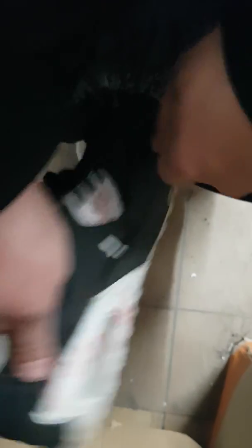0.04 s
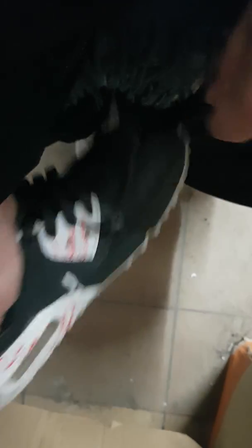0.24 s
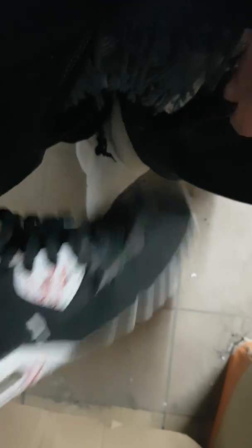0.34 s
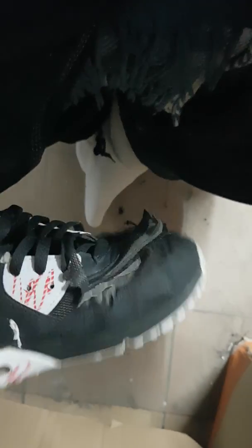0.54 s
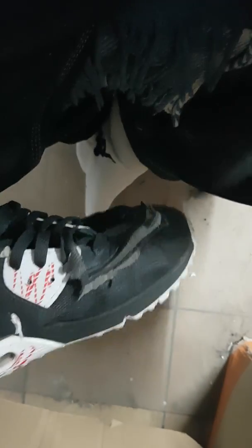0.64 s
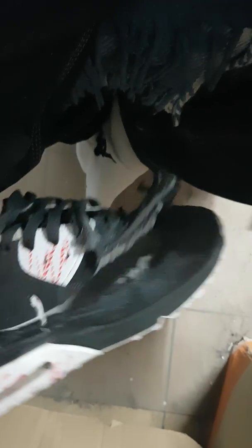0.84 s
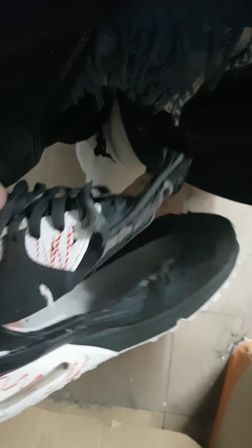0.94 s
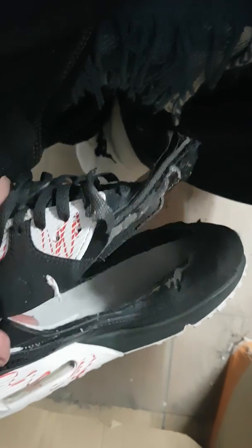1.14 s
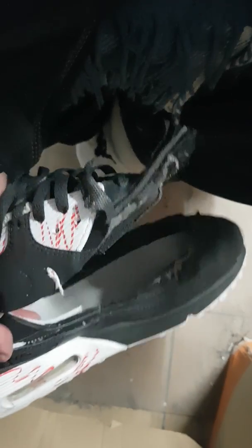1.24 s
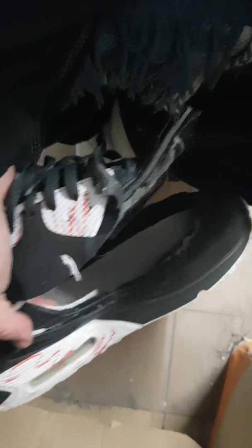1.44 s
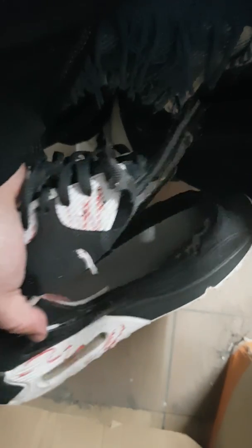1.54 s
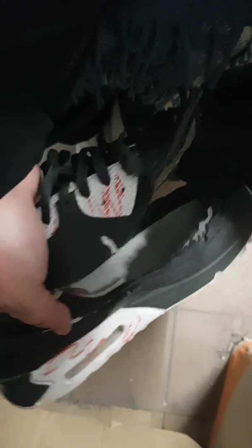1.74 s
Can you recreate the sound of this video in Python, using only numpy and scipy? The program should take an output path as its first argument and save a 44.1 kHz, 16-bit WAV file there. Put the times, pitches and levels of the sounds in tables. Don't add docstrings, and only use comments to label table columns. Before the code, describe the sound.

A sneaker's rubber sole slaps and scuffs tiles, close and left: light ticks from 0.1 s, a dense burst of hollow knocks, gritty scrape and dry cracks at 0.2-0.27 s, with soft low thumps, then a weaker knock at 0.33 s. Clothes rustle and fold softly throughout. From 1.3 to 1.8 s fabric slides with a faint, very high whine; a stitch snaps at 1.6 s. Small hard room, low appliance hum.

```python
import sys
import numpy as np
from scipy import signal
from scipy.fft import rfft, irfft
from scipy.io import wavfile
from scipy.ndimage import uniform_filter1d, map_coordinates

SR = 44100
rng = np.random.default_rng(int(sys.argv[2]) if len(sys.argv) > 2 else 0)


def decibels_to_gain(level_db):
    exponent = np.asarray(level_db, float) / 20
    return 10 ** exponent


def int16_out(signal):
    q = np.round(np.clip(np.atleast_2d(signal).T, -1, 1) * 32767)
    wavfile.write(sys.argv[1], SR, q.astype(np.int16))


N = 79380
T = np.arange(N) / SR

# [f/Hz, level/dB per Hz]
ROOM_AIR = [(25, -42), (60, -21), (120, -2.5), (250, -6), (700, -12.5), (1500, -22.5), (4000, -39),
            (7000, -51), (16000, -28)]
# [f/Hz, left minus right/dB]
ROOM_BALANCE = [(60, -28), (200, -3.5), (700, -2.5), (1300, 0), (2400, 10), (5000, 14), (15000, 7.5)]
# [f/Hz, likeness, limited to -0.95 to 0.95 in use]
ROOM_LIKENESS = [(40, -0.1), (300, 0.75), (640, -0.19), (1400, -1.44), (3100, 0.61), (15000, -0.043)]
# [f/Hz, waver/dB, level/dB, left minus right/dB]
APPLIANCE_HUM = [(35.8, .5, -57.5, 0), (49, 2, -73, 0), (90, 2, -65, -10), (144.2, .8, -60.5, -6),
                 (165, 2.5, -68, -5), (205, 4, -73, -4)]
# [t/s, level/dB, brightness/dB per octave]
RUSTLE_MOVES = [(0, -66.5, -2.2), (.4, -68.5, 1), (.7, -70, 0.1), (.98, -70, 0.93), (1.08, -74, -1),
                (1.25, -73.5, -1.5), (1.4, -69, -1.5), (1.65, -66, -1.8), (1.8, -72.5, -1.5)]
# [f/Hz, level/dB per Hz]
CLOTH_TONE = [(250, 3.5), (450, 1.5), (800, -2), (1300, -16), (3000, -14.5), (5000, -41), (9000, -29.5),
              (16000, -25.5)]
# [t/s, level/dB]
SCUFF_PRESSURE = [(0, -53), (.045, -68.5), (.1, -68), (.165, -53.5), (.198, -50), (.206, -38),
                  (.235, -35.5), (.27, -48.5), (.33, -58.5), (.35, -71), (.42, -79)]
# [f/Hz, level/dB per Hz]
GRIT_TONE = [(700, -31), (1300, -0.5), (2500, -1), (4500, -9.5), (8000, -9.5), (12000, -10), (16000, -10)]
# [f/Hz, level/dB, time to fall 60 dB/s]
SHOE_MODES = [(234, -14, 0.031), (300, -8.5, 0.03), (436, -10.5, 0.019), (680, -6, 0.013),
              (827, 5.5, 0.013), (1058, -0.5, 0.017), (1240, -8, 0.014), (1640, -7, 0.0084)]
# [t/s, peak level/dB, f/Hz]
CLOTH_FOLDS = [(0.018, -44.5, 332), (0.516, -52.5, 336), (0.552, -55, 350), (0.682, -52.5, 336),
               (0.797, -53.5, 259), (0.832, -46.5, 256), (0.859, -50.5, 384), (1.348, -52, 428),
               (1.494, -47.5, 218), (1.564, -48, 420), (1.75, -54.5, 221)]
# [t/s, peak level/dB, centre f/Hz, decay/ms]
THREAD_SNAPS = [(.1085, -44, 8000, .6), (0.1182, -29.5, 11500, 0.8), (.13, -45, 9000, 1.7),
                (.138, -34, 13500, 1.4), (0.1434, -35, 3480, 0.23), (0.15, -42, 10000, .9),
                (.1575, -45, 12000, .6), (0.168, -39, 11000, .6), (0.172, -37, 7500, .7),
                (0.1773, -31.5, 9500, .7), (0.182, -42, 10000, .6), (.1855, -32, 9100, 1.1),
                (0.194, -38, 9000, 0.47), (0.197, -31, 11000, 0.68), (0.2023, -33, 6000, .7),
                (0.209, -38, 6000, 0.52), (0.213, -25, 4000, 0.37), (0.213, -16, 3130, 0.83),
                (.2153, -17, 5940, 0.91), (0.2255, -17, 5930, 0.36), (.227, -18.5, 5040, 0.27),
                (.2297, -19, 12000, 0.44), (0.2323, -26, 6500, 0.45), (0.2341, -20.5, 5950, 0.53),
                (.2375, -22, 13000, 0.5), (0.2422, -15, 10000, 0.6), (0.249, -18.5, 9000, 0.7),
                (.251, -33, 10000, .6), (.2595, -22, 8050, 0.49), (.269, -34, 10000, 3.4),
                (.279, -37, 9000, 1.8), (.332, -35.5, 3920, 1.1), (0.3355, -28.5, 12600, 1.2),
                (0.458, -48, 9000, 1.5)]
# [t/s, peak level/dB, f/Hz, time to fall 60 dB/s]
SOLE_KNOCKS = [(0.1131, -39, 304, 0.039), (0.1176, -29, 470, 0.015), (0.13, -44, 200, 0.046),
               (0.144, -31, 606, .02), (.16, -36, 190, .05), (.167, -42, 925, 0.023),
               (0.1777, -26, 1026, 0.024), (.186, -35, 1000, .02), (0.1936, -22, 1030, .015),
               (0.1986, -26.5, 870, 0.023), (.2025, -14.5, 680, 0.033), (.208, -19.5, 1080, .02),
               (.212, -13, 910, 0.027), (.2145, -13, 837, 0.046), (0.2207, -15, 607, 0.043),
               (.2262, -9, 680, 0.077), (.228, -5, 680, 0.035), (.232, -12.5, 461, 0.044),
               (0.2363, -11, 512, 0.025), (0.2426, -9.5, 291, 0.032), (.249, -17, 410, 0.023),
               (.26, -10, 713, 0.015), (.265, -25, 438, 0.038), (.279, -27, 680, 0.036),
               (.296, -38, 626, .04), (.332, -22, 718, 0.035), (0.3354, -23, 1088, 0.023),
               (.209, -20.5, 242, 0.08), (0.218, -22, 1270, 0.023), (.234, -19, 1066, 0.027),
               (.246, -23, 238, .05), (.251, -19, 1100, 0.018), (.334, -26.5, 867, 0.047)]
# [t/s, peak level/dB, f/Hz, time to fall 60 dB/s]
HEEL_THUMPS = [
    (.119, -36, 150, .07),
    (.154, -38, 145, .07),
    (.207, -39, 60, .1),
    (.25, -33, 112, .11),
]
# [t/s, threads crossed per second as f/Hz, level/dB]
SLEEVE_SLIDE = [(1.255, 7800, -80), (1.29, 9100, -85), (1.32, 9800, -83), (1.355, 11050, -71),
                (1.385, 11850, -71), (1.46, 12420, -68), (1.485, 11950, -67), (1.515, 11850, -66),
                (1.55, 12300, -67), (1.605, 14150, -69), (1.63, 14850, -72), (1.655, 14850, -73),
                (1.685, 13800, -77), (1.72, 13150, -78), (1.75, 12400, -69), (1.775, 10600, -82),
                (1.8, 8700, -87)]
# [start t/s, end t/s, share of main pitch at start, share at end, level/dB]
WEAVE_PATCHES = [(1.33, 1.48, 1.04, 1.02, -70), (1.46, 1.59, 1.05, 1.02, -71),
                 (1.68, 1.735, .915, .845, -66), (1.38, 1.56, .8, .83, -87), (1.34, 1.45, 1.29, 1.27, -85),
                 (1.56, 1.63, .84, .76, -79), (1.6, 1.72, .8, .86, -79), (1.73, 1.79, 1.17, 1.2, -78),
                 (1.33, 1.5, .94, .93, -83), (1.71, 1.75, .84, .82, -80), (1.655, 1.69, .98, .99, -77),
                 (1.73, 1.77, 1.07, 1.02, -76), (1.74, 1.78, .76, .78, -86), (1.66, 1.71, 1.04, 1.03, -82)]
# [t/s, peak level/dB, low edge f/Hz, high edge f/Hz]
STITCH_BREAK = (1.5947, -30, 450, 11800)
# [f/Hz, level/dB, time to fall 60 dB/s]
STITCH_FIBRES = [(2700, -5, .004), (5100, -1, .006), (7600, -5, .004), (9000, -4, .005), (11300, -4, .007)]
LEFT_RIGHT = np.array([[1], [-1]])


def unit(x):
    return x / np.sqrt(np.mean(x ** 2))


def curve(rows, col=1):
    rows = np.array(rows)
    return np.interp(T, rows[:, 0], rows[:, col])


def along(rows, hz):
    rows = np.array(rows)
    return np.interp(np.log(np.maximum(hz, 1)), np.log(rows[:, 0]), rows[:, 1])


def colour(x, rows):
    cepstrum = irfft(along(rows, np.fft.rfftfreq(2048, 1 / SR)) * np.log(10) / 20)
    cepstrum[1:1024] *= 2
    cepstrum[1025:] = 0
    response = irfft(np.exp(rfft(cepstrum)))[:1024]
    return signal.fftconvolve(x, response)[:N]


def band(x, hz, width_hz):
    return signal.lfilter(*signal.iirpeak(min(hz, 0.45 * SR), hz / width_hz, SR), x)


def walk(rate_hz):
    hold = int(SR / rate_hz)
    steps = np.repeat(rng.standard_normal(N // hold + 1), hold)
    return unit(uniform_filter1d(uniform_filter1d(steps, hold), hold)[:N])


def fade(t, t60_s):
    return 1000. ** (-t / t60_s)


def ring(hz, t60_s, size=4000):
    t = np.arange(size) / SR
    return np.sin(2 * np.pi * hz * t) * fade(t, t60_s)


def room():
    hz = np.fft.rfftfreq(N, 1 / SR)
    alike = np.clip(along(ROOM_LIKENESS, hz), -0.95, 0.95)
    mid, side = rfft(rng.standard_normal((2, N))) * np.sqrt([1 + alike, 1 - alike])
    tone = decibels_to_gain(along(ROOM_AIR, hz) + LEFT_RIGHT * along(ROOM_BALANCE, hz) / 2)
    air = (mid + LEFT_RIGHT * side) * tone * (hz > 25)
    out = irfft(air, N) / np.std(irfft(air * (hz > 200), N)) * decibels_to_gain(-64.5)
    for f, waver_db, db, pan_db in APPLIANCE_HUM:
        level = decibels_to_gain(db + LEFT_RIGHT * pan_db / 2 + waver_db * walk(12.0))
        cycles = f * T + 0.06 * walk(18.0)
        out = out + level * unit(np.sin(2 * np.pi * cycles))
    return out


def clothes():
    level_db, flicker_db, swell_db = 12, 2.96, 0.66
    out, swell = 0, walk(5.73)
    for hz in 280 * 2 ** np.arange(0, 6, 0.5):
        pan_db = along(ROOM_BALANCE, hz) / 2 * LEFT_RIGHT
        flicker = decibels_to_gain(pan_db + swell_db * swell + flicker_db * walk(14.01))
        grain = band(rng.standard_normal((2, N)), hz, hz / 3.76) * flicker
        brightness_db = curve(RUSTLE_MOVES, col=2) * np.log2(hz / 500)
        out = out + decibels_to_gain(along(CLOTH_TONE, hz) + brightness_db) * grain
    return unit(out) * decibels_to_gain(curve(RUSTLE_MOVES) + level_db)


def scuff():
    slips_per_s, spread_db, stutter_db, hiss = 4500, 1.4, 2, 0.35
    grit_db, boom_db = 5, 9.5
    happens = rng.random(N) < slips_per_s / SR
    slips = happens * rng.standard_normal(N) * decibels_to_gain(spread_db * rng.exponential(size=N))
    grit = unit(colour(slips + hiss * rng.standard_normal(N), GRIT_TONE))
    shoe = sum(decibels_to_gain(db) * ring(hz, t60) for hz, db, t60 in SHOE_MODES)
    boom = unit(signal.fftconvolve(slips, shoe)[:N])
    lift_off = np.clip((0.45 - T) / 0.057, 0, 1)
    press = decibels_to_gain(curve(SCUFF_PRESSURE) + stutter_db * walk(219.5)) * lift_off
    return press * (decibels_to_gain(grit_db) * grit + decibels_to_gain(boom_db) * boom)


def folds():
    rise_s, t60_s, pan_db = 0.0029, 0.07, -3
    out = 0
    for s, db, hz in CLOTH_FOLDS:
        late = np.maximum(T - s, 0)
        noise = band(band(rng.standard_normal(N), hz, hz / 2), hz, hz / 2)
        flap = noise * (1 - np.exp(-late / rise_s)) * fade(late, t60_s)
        out = out + decibels_to_gain(db) * flap / np.abs(flap).max()
    return out * decibels_to_gain(pan_db / 2 * LEFT_RIGHT)


def snaps():
    out, size = np.zeros(N), 1000
    for s, db, hz, decay_ms in THREAD_SNAPS:
        burst = rng.standard_normal(size) * np.exp(-T[:size] * 1000 / decay_ms)
        crack = band(burst, hz, hz * 0.7)
        i = int(s * SR)
        out[i:i + size] += decibels_to_gain(db) * crack / np.abs(crack).max()
    return out


def knocks():
    push_s, shared_db, scatter_db = 0.00063, -10.5, 2
    out, size = np.zeros(N), 4000
    push = np.sin(np.pi * np.clip(T[:200] / push_s, 0, 1)) ** 2
    for s, db, hz, spot_t60 in SOLE_KNOCKS:
        body = ring(hz, spot_t60)
        for f, mode_db, t60 in SHOE_MODES:
            body = body + decibels_to_gain(mode_db + shared_db + scatter_db * rng.standard_normal()) * ring(f, t60)
        body = np.convolve(body, push)[:size]
        i = int(s * SR)
        out[i:i + size] += decibels_to_gain(db) * body / np.abs(body).max()
    return out


def heel():
    out, rise_s = 0, 0.0087
    for s, db, hz, t60 in HEEL_THUMPS:
        late = np.maximum(T - s, 0)
        swell = 1 - np.exp(-late / rise_s)
        out = out + decibels_to_gain(db) * np.sin(2 * np.pi * hz * late) * swell * fade(late, t60)
    return out


def weave_tone(hz):
    wobble_hz, flutter_db = 38, 2.5
    cycles = np.cumsum(hz + wobble_hz * walk(300)) / SR
    return np.sqrt(2) * np.sin(2 * np.pi * cycles) * decibels_to_gain(flutter_db * walk(150))


def sleeve():
    level_db, pan_db = 0.5, 10.5
    hiss_db, hiss_hz, hiss_late_s = -6, 12100, 0.13
    hz = uniform_filter1d(curve(SLEEVE_SLIDE), size=900)
    main = decibels_to_gain(curve(SLEEVE_SLIDE, col=2)) * np.clip((T - SLEEVE_SLIDE[0][0]) / 0.015, 0, 1)
    out = main * weave_tone(hz * 0.99)
    for start, end, first, last, db in WEAVE_PATCHES:
        place = np.clip((T - start) / (end - start), 0, 1)
        share = first + (last - first) * place ** 2
        out = out + decibels_to_gain(db) * np.sin(np.pi * place) ** 0.52 * weave_tone(hz * share)
    hiss = unit(band(band(rng.standard_normal(N), hiss_hz, 2600), hiss_hz, 2600))
    hiss_level = np.interp(T - hiss_late_s, T, uniform_filter1d(main, size=4000))
    out = decibels_to_gain(level_db) * (out + decibels_to_gain(hiss_db) * hiss_level * hiss)
    return np.array([out * decibels_to_gain(pan_db / 2), np.roll(out, shift=9) * decibels_to_gain(-pan_db / 2)])


def stitch():
    s, db, low_hz, high_hz = STITCH_BREAK
    late = np.maximum(T - s, 0)
    plick = np.sin(2 * np.pi * 1000 * late) * fade(late, 0.008)
    fibres = sum(decibels_to_gain(g) * np.sin(2 * np.pi * hz * late) * fade(late, t60) for hz, g, t60 in STITCH_FIBRES)
    rattle = 0.45 * rng.standard_normal(N) * np.exp(-late / 0.001)
    snap = (T >= s) * (plick + fibres + rattle)
    snap = signal.sosfilt(signal.butter(3, [low_hz, high_hz], "band", fs=SR, output="sos"), snap)
    return decibels_to_gain(db) * snap / np.abs(snap).max()


def microphones(x):
    lag_s, far_db, far_hz, far_treble_db = 0.000425, -8.5, 1480, -36
    echo_t60_s, echo_db, echo_hz, echo_gap_s = 0.17, -18, 2590, 0.0019
    soft = signal.lfilter(*signal.butter(1, far_hz, fs=SR), x)
    far = decibels_to_gain(far_db) * soft + decibels_to_gain(far_treble_db) * (x - soft)
    far = map_coordinates(far, [(T - lag_s) * SR], order=3)
    t = T[:SR // 2]
    echo = rng.standard_normal((2, len(t))) * fade(t, echo_t60_s) * np.clip(t / echo_gap_s - 1, 0, 1)
    echo = signal.lfilter(*signal.butter(1, echo_hz, fs=SR), echo)
    echo = echo / np.sqrt(np.sum(echo ** 2) / 2)
    return np.array([x, far]) + decibels_to_gain(echo_db) * signal.fftconvolve(x[None], echo, axes=1)[:, :N]


def scene():
    shoe = scuff() + snaps() + knocks()
    shoe = signal.sosfilt(signal.butter(2, 180, "high", fs=SR, output="sos"), shoe)
    return room() + clothes() + folds() + microphones(shoe + stitch()) + heel() + sleeve()


def roll_off(x):
    return signal.sosfilt(signal.butter(12, 16690, fs=SR, output="sos"), x)


def record(dry):
    mix = signal.sosfilt(signal.ellip(10, 0.2, 60, 15870, fs=SR, output="sos"), dry)
    return roll_off(mix)


dry = scene()
out = record(dry)
int16_out(out)
```